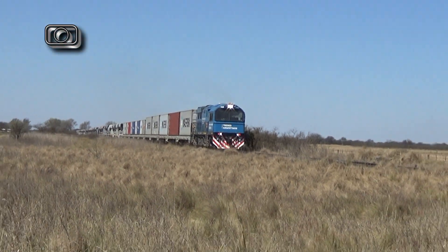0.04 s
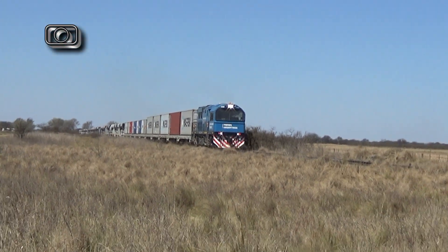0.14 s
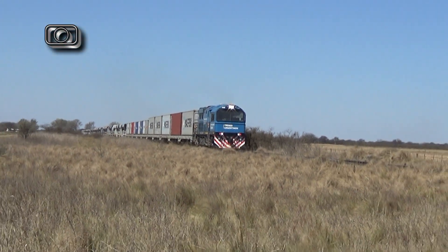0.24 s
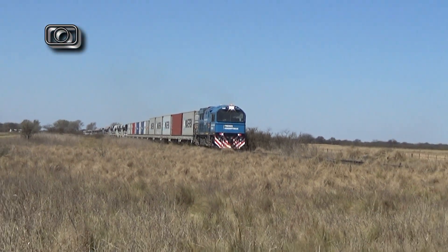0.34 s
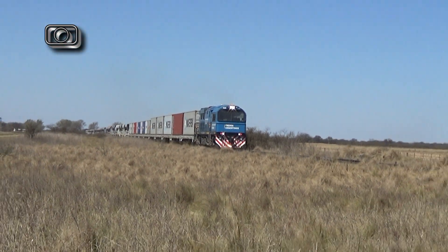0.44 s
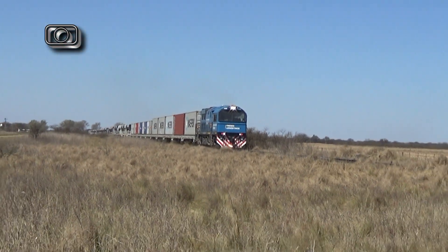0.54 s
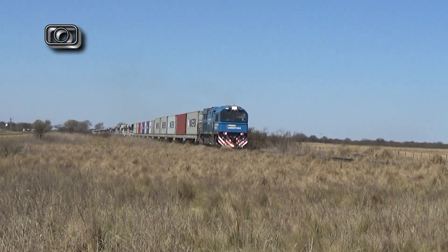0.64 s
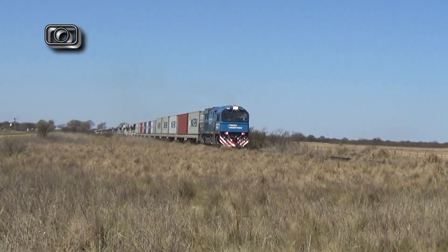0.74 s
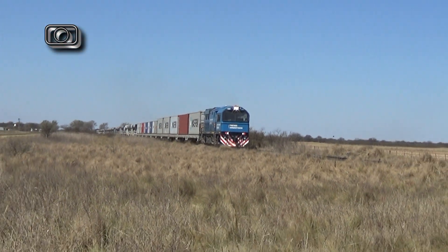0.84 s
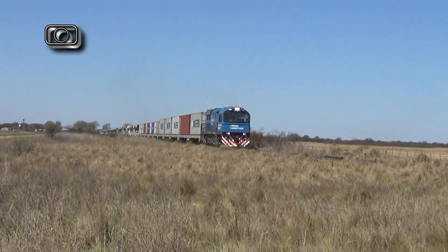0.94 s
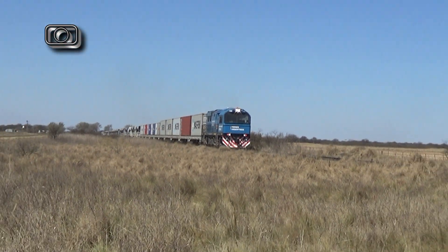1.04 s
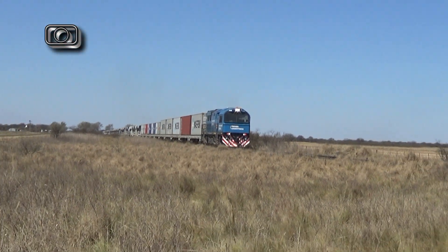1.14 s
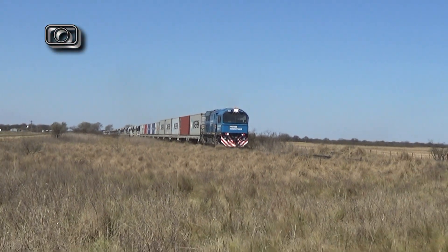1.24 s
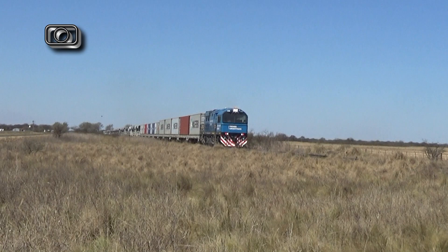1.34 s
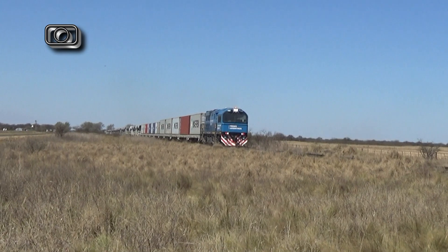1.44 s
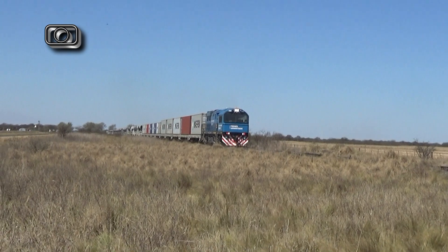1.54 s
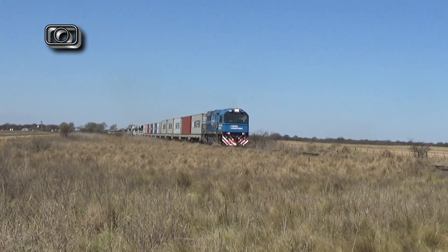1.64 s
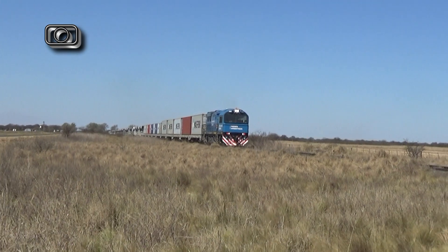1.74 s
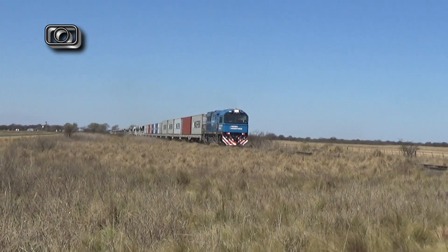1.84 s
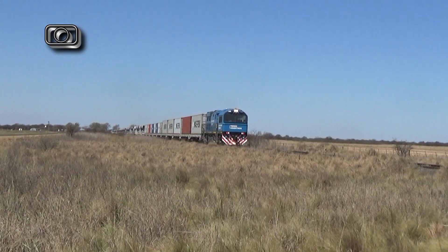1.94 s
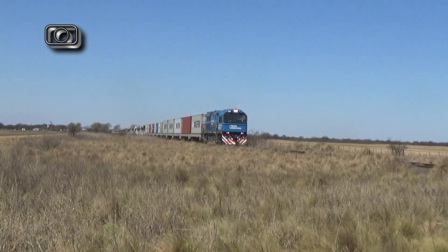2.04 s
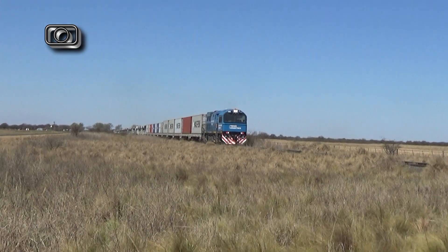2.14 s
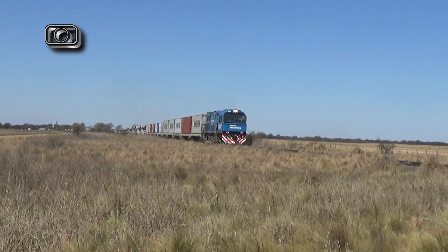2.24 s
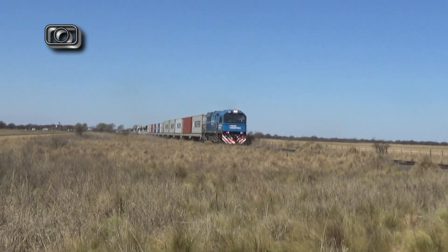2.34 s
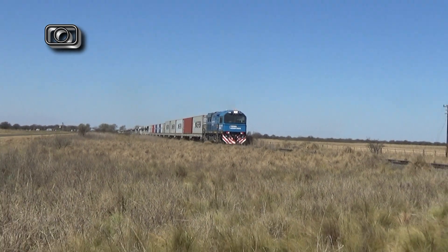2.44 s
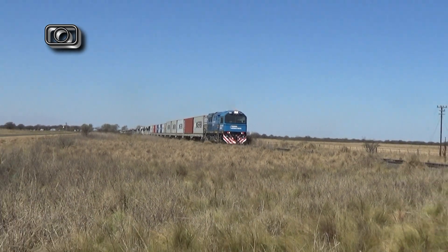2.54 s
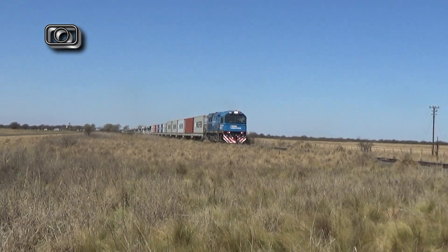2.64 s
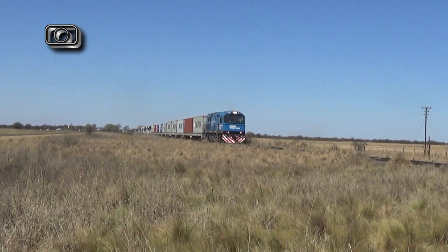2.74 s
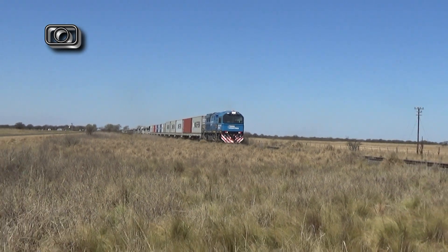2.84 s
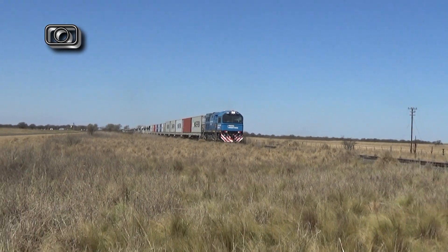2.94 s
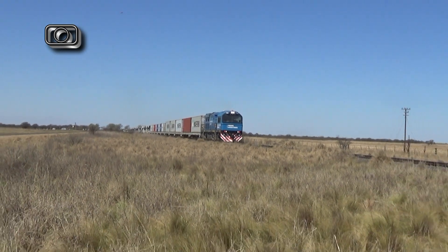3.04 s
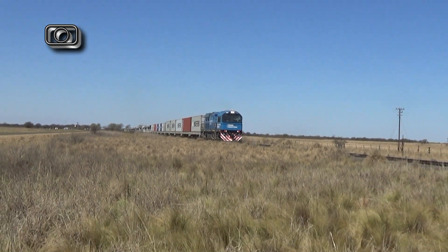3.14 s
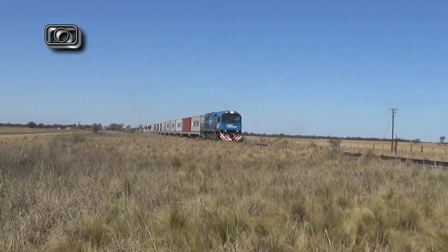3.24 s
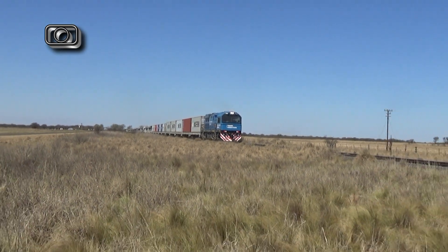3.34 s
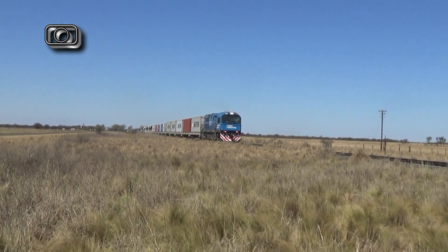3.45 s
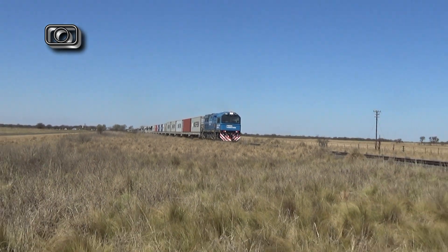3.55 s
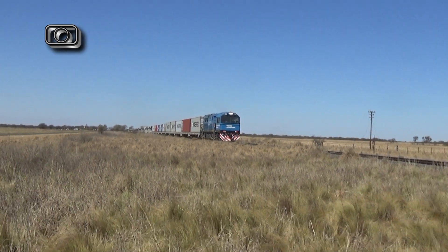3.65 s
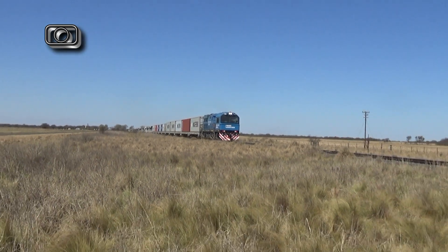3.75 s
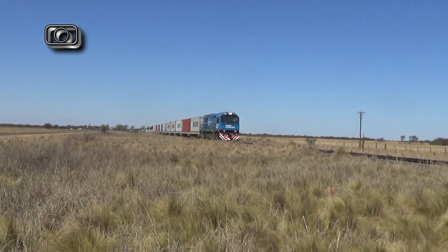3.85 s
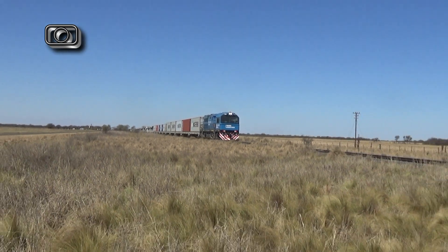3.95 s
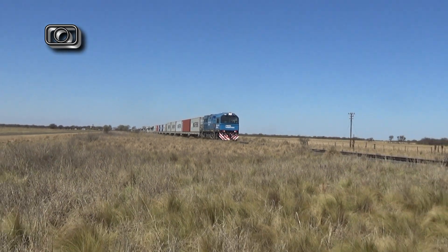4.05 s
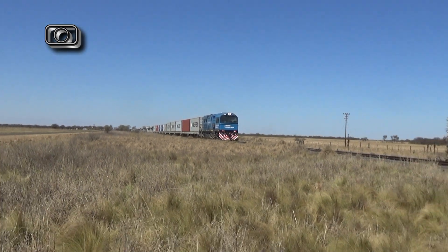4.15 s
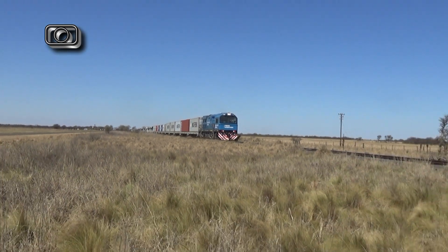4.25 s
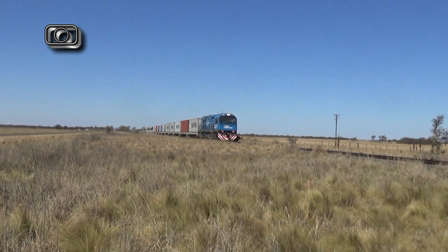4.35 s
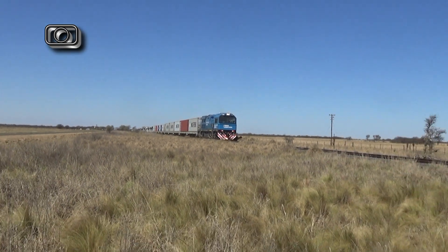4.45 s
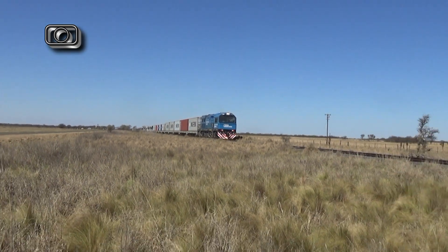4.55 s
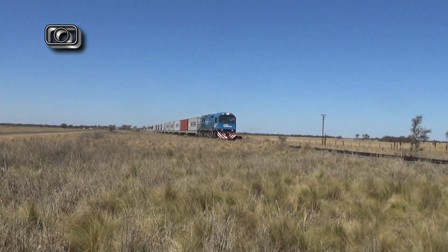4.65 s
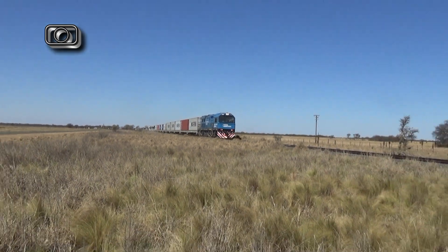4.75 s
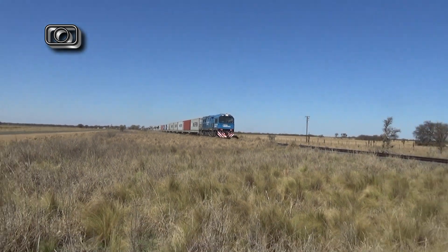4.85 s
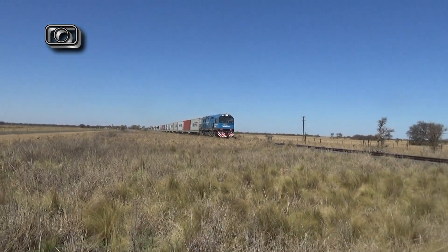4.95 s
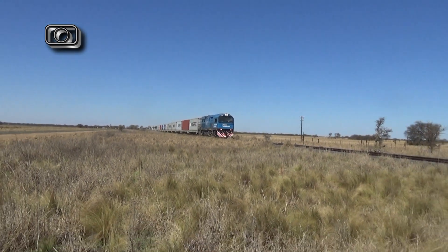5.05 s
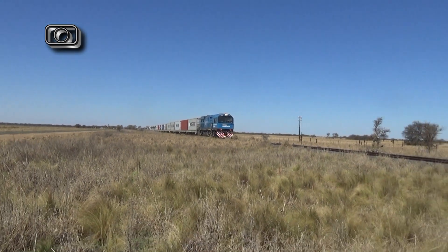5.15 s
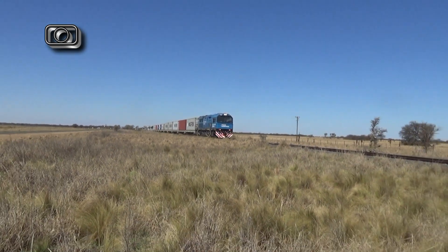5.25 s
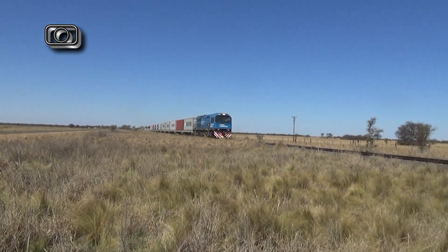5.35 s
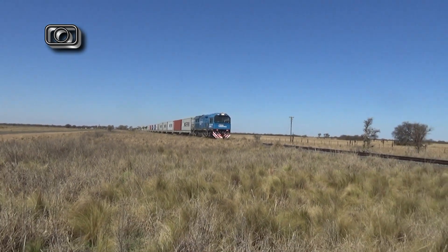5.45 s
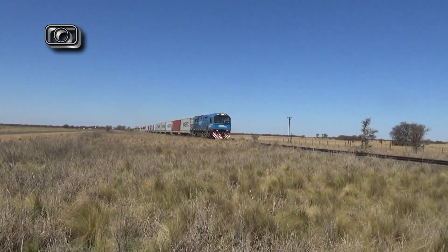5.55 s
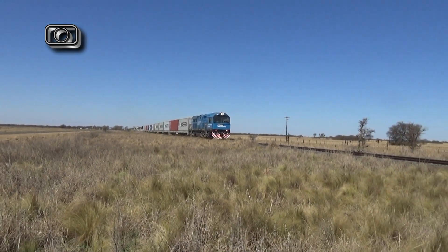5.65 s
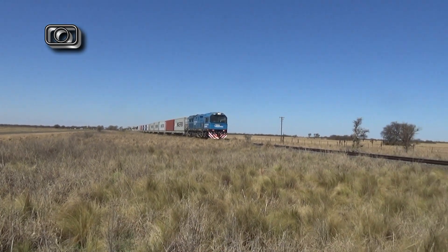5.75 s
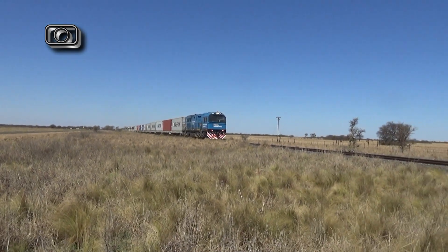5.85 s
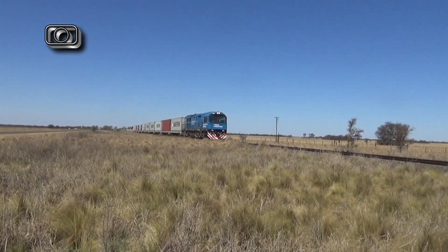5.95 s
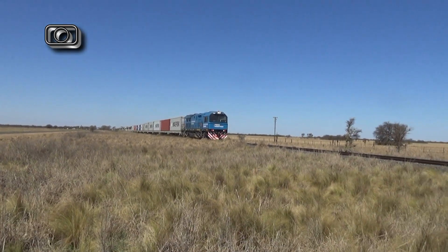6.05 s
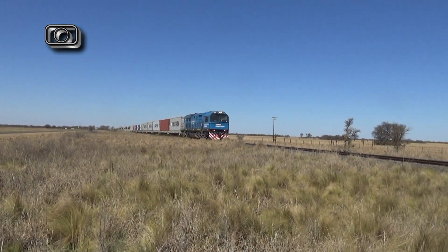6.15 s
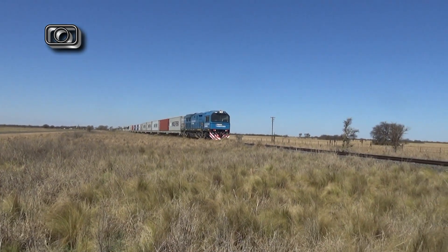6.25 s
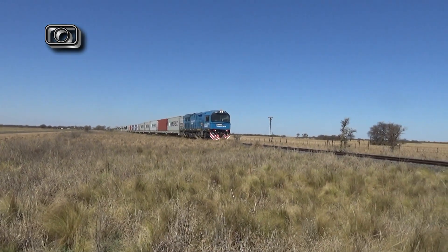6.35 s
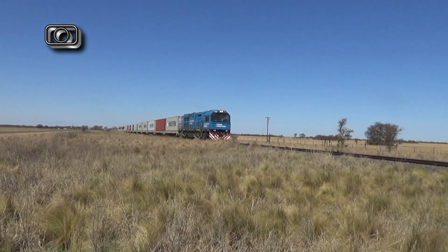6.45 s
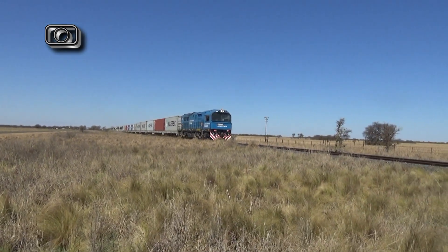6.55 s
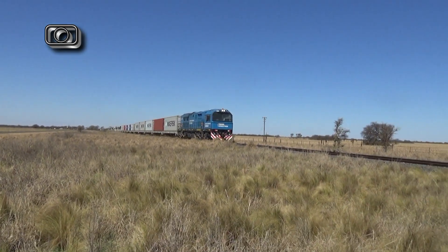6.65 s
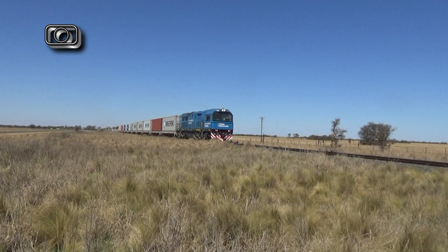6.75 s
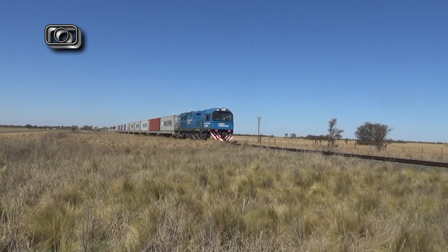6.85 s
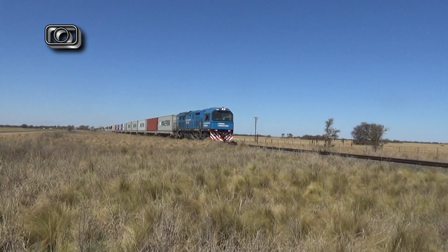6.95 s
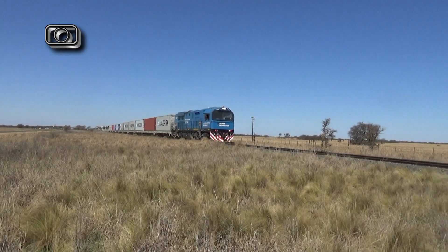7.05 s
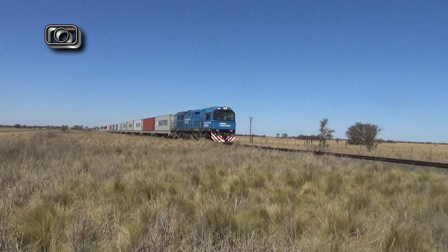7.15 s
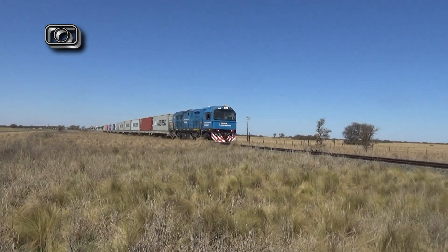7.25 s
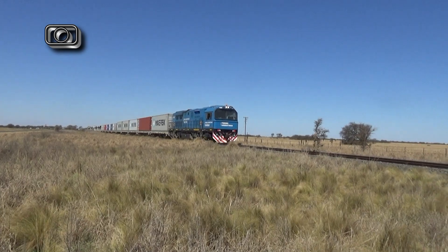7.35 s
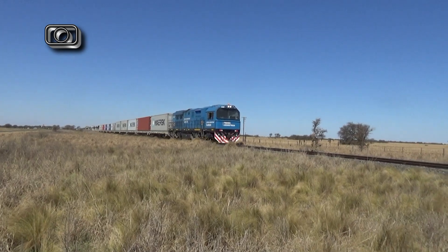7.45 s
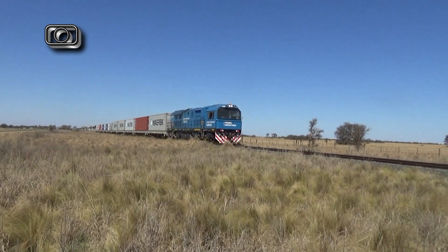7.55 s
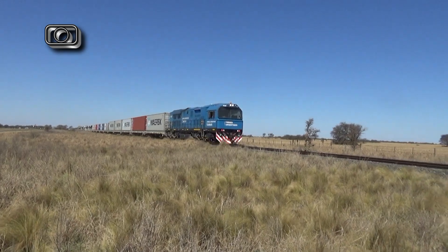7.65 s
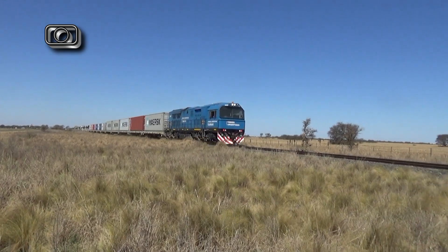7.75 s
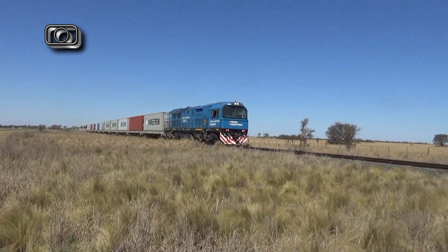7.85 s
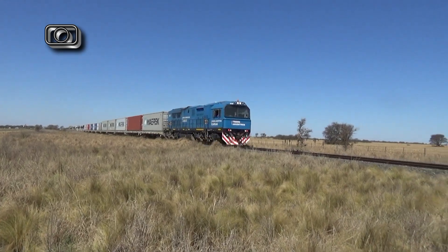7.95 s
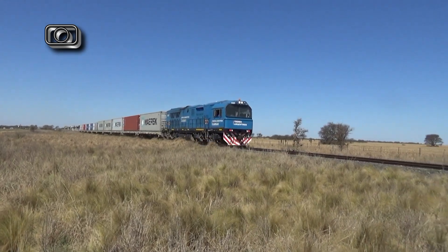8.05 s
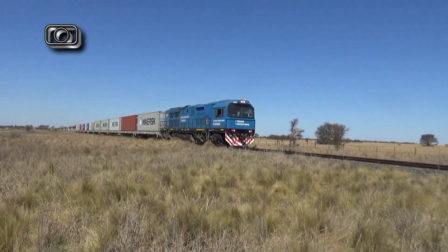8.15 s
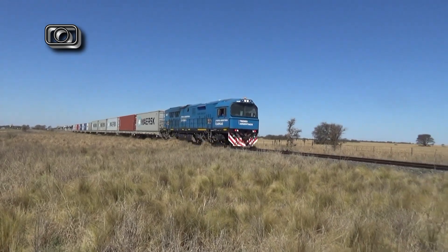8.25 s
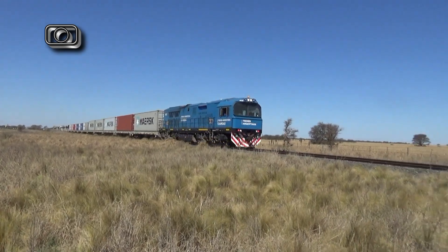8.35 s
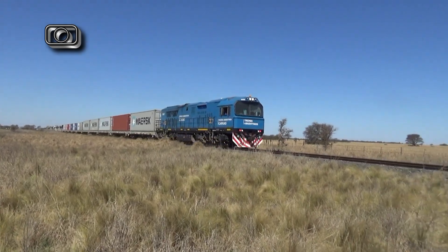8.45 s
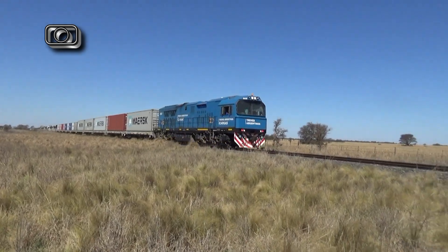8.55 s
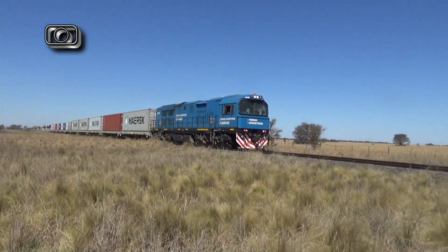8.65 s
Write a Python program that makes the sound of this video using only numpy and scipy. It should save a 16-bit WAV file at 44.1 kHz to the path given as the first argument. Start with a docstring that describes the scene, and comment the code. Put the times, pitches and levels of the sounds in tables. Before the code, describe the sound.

Outdoors in open grassland, a diesel locomotive is at first barely audible under soft microphone hiss and low breeze. Its steady hum wavers in gusts. Midway a loud air horn holds one high note for over a second while a lower trumpet joins in two short blasts. Afterwards the engine grows steadily brighter and louder, ending as a throbbing, metallic roar nearby, slightly left in a small stereo microphone.

```python
"""Diesel locomotive with air horn, open grassland

A locomotive draws near at a steady engine speed: tones locked to its shaft, and noise ringing in its panels.
Its two-tone horn, built from overtones, holds one long high note, and the low trumpet joins twice.
The air carries more treble as the distance shrinks; gusts swell the upper sound over breeze and a faint tick.
A small pair of microphone ports with its own hiss picks it up; a limiter presses the engine under the horn."""
import sys
import numpy as np
from scipy import signal
from scipy.fft import rfft, irfft, next_fast_len
from scipy.io import wavfile

SR = 44100
rng = np.random.default_rng(int(sys.argv[2]) if len(sys.argv) > 2 else 0)


def persist_wave(psi):
    """Save psi, clipped to +-1, as 16-bit WAV."""
    counts = np.round(np.clip(psi, -1, 1) * 32767).astype(np.int16)
    wavfile.write(sys.argv[1], SR, np.atleast_2d(counts).T)


N = 383229
T = np.arange(N) / SR   # seconds
HZ = np.fft.rfftfreq(next_fast_len(N, True), 1 / SR)
SIZE = 2 * (len(HZ) - 1)   # transform length


def from_db(db):
    """Decibels to gain."""
    return 10 ** (np.asarray(db) / 20)


def rms_one(x):
    """Scale to rms 1."""
    return x / np.sqrt(np.mean(x ** 2) + 1e-20)


def in_time(rows):
    """Columns of a table, joined by straight lines, at every sample."""
    seconds, *columns = np.transpose(rows)
    return [np.interp(T, seconds, column) for column in columns]


def at_hz(points, hz):
    """Value of a spectrum, joined by straight lines on a log-frequency axis."""
    point_hz, value = np.transpose(points)
    return np.interp(np.log(np.maximum(hz, 1)), np.log(np.maximum(point_hz, 1)), value)


def drift(corner_hz):
    """Slow chance of spread 1: noise at SR / 40 through a double one-pole low-pass."""
    r = np.exp(-80 * np.pi * corner_hz / SR)
    noise = rng.standard_normal(N // 40 + 2002)
    slow = signal.lfilter([1], [1, -2 * r, r * r], noise)[2000:]
    return np.interp(np.arange(N) / 40, np.arange(len(slow)), rms_one(slow))


def coloured(gain):
    """Noise of rms 1 with a gain given at every frequency."""
    white = rfft(rng.standard_normal(SIZE))
    return rms_one(irfft(white * gain, SIZE)[:N])


# The engine drawing near over the grass.
# Each row: time in seconds, then relative levels in dB of exhaust beat, body roar and rushing band.
APPROACH = [(0, -50, -49, -61.5), (1.5, -49, -48, -66), (3.0, -44.5, -44, -57.5), (4.2, -43, -41.5, -56.5),
            (5.72, -45, -37, -50.5), (6.1, -42.5, -36.5, -51), (6.8, -38, -34, -48),
            (7.0, -36.5, -32.5, -43.5), (7.67, -32.5, -26.5, -34.5), (8.12, -30, -24.5, -32),
            (8.69, -27, -22, -33)]
# Gusty air carries the upper sound across in swells.
# Each row: middle in seconds, time to fall away in seconds (Gaussian, to 1/e), middle and treble gain in dB.
SWELLS = [(0.16, 0.12, 7, -10), (0.666, .1, 3, -7), (1.113, .07, 5, -6), (1.473, 0.15, 5.5, -1),
          (1.955, 0.074, 2.5, -10), (2.856, 0.12, 6, 0), (3.3, 0.17, 1, 6), (4.255, 0.28, 6.5, 3.5),
          (5.68, 0.3, 3.5, 3.5), (5.89, 0.073, -1.5, 4), (6.3, 0.084, -0.5, 1.5), (6.577, 0.18, 1.5, 6),
          (7.162, 0.07, 2.5, 1.5), (7.42, 0.059, -1, 3), (7.769, .11, 0.5, 12.5), (8.462, .12, 1, 13)]
# Air and grass swallow treble over distance, the ground echo hollows out 800 Hz: dB per dB of the body roar.
CLATTER_GROWS, HOLLOW_GROWS = 1.45, 1.23


def band_levels():
    """Beat, roar, machinery, clatter, rush and hollow in dB: all follow the approach, three also the gusts."""
    beat_db, body_db, rush_db = in_time(APPROACH)
    middle_s, half_s, *gains = np.transpose(SWELLS)
    bumps = np.exp(-((T[::100, None] - middle_s) / half_s) ** 2)
    middle_db, treble_db = [np.interp(T, T[::100], bumps @ gain) for gain in gains]
    machinery_db = body_db + middle_db
    clatter_db = CLATTER_GROWS * body_db + treble_db
    return [beat_db, body_db, machinery_db, clatter_db, rush_db + middle_db, HOLLOW_GROWS * body_db]


# The shaft against a steady speed. Each row: time in seconds, lead in turns.
AHEAD = [(0, -.052), (3.8, -.06), (7.4, 0), (8.7, .012)]
REV_PER_S = 13.266
TURN = REV_PER_S * T + np.interp(T, *np.transpose(AHEAD))   # turns of the shaft so far
# Exhaust tones at the stack. Each row: multiple of shaft speed, relative level in dB.
BEAT = [(1, -48), (2, -34), (3, -21), (4, -20), (5, 1.5), (6, -30.5), (7, -9.5), (8, -4.5), (9, -11),
        (10, -8), (11, -7), (12, -21.5), (13, -3.5), (14, -8), (15, -14), (16, -20), (17, -8), (18, -6.5),
        (19, -12), (20, -10.5), (21, -13.5), (22, -14), (23, -22), (24, -8.5), (25, -36), (26, -7),
        (27, -12), (28, -2), (29, -2), (30, -19), (31, -32), (32, -13), (33, -11), (34, -14), (35, -1.5),
        (36, -10.5), (37, 2.5), (38, -8.5), (39, -1.5), (40, -12), (41, -35.5), (42, -54), (43, -4),
        (44, -23), (45, -8), (46, -19)]
# Pressure dips at the stack, mostly in pairs. Each row: place as a share of a turn, relative depth.
DIPS = [(.038, .6), (.086, 1), (.265, .45), (.316, .4), (.453, 1), (.482, .7), (.626, .7), (.854, .7),
        (.891, .5)]
# Gear whine. Each row: multiple of shaft speed, peak in dB beside the upper exhaust tones at rms 1.
WHINE = [(47, -12), (58.75, -13), (66.1, -21), (94, -17)]


def exhaust(beat_db, body_db):
    """Tones on the shaft speed, phased by the pressure dips, plus gears; higher ones waver more on the way."""
    share, depth = np.transpose(DIPS)
    turn = TURN[::10]   # these tones need only every tenth sample
    low, high = 0, 0
    for k, db in BEAT:
        start = np.angle(-np.sum(depth * np.exp(-2j * np.pi * k * share)))
        waver = drift(0.88)[::10] * k
        phase = 2 * np.pi * k * turn + start + .012 * waver[::-1]
        tone = from_db(db + .05 * waver) * np.cos(phase)
        if k < 24:
            low = low + tone
        else:
            high = high + tone
    whine = 0
    for k, db in WHINE:
        whine = whine + from_db(db + 1.1 * drift(10.0)[::10]) * np.cos(2 * np.pi * k * turn)
    coarse = [rms_one(low), rms_one(high) + whine]
    low, high = signal.resample_poly(coarse, 10, 1, axis=1)[:, :N]
    return from_db(beat_db + 7.0) * low + from_db(body_db - 3.0) * high


# Hiss puffs at the firings. Each row: place as a share of a turn, relative strength in dB.
FIRINGS = [(.118, -3), (.313, -1), (.488, -.5), (.725, -1.5), (.88, -3)]


def puffs(width):
    """A bump at each firing, new in strength on every turn; width in turns, mean 1."""
    out = 0
    luck_db = rng.normal(0, 2.5, (int(TURN[-1]) + 3, len(FIRINGS)))
    for k, (share, db) in enumerate(FIRINGS):
        nearest = np.round(TURN - share)
        strength = from_db(db + luck_db[nearest.astype(int) + 1, k])
        out = out + strength * np.exp(-((TURN - share - nearest) / width) ** 2)
    return out / out.mean()


# Body roar when the engine is near. Each row: frequency in Hz, relative level in dB per Hz.
ROAR = [(15, -42), (30, -21), (60, -2), (130, -8), (250, -2), (400, 1), (510, 10.5), (680, -9),
        (1450, -6.5), (1950, -12), (3000, -13.5), (5700, -26), (8200, -39.5), (11000, -37.5), (15500, -56)]
# Resonances of hood and frame. Each row: frequency in Hz, width in Hz, peak in dB on the scale of the roar.
PANELS = [(938, 126, 5.5), (1512, 21, 2.5), (2280, 230, -1), (4280, 94, -15), (5560, 170, -12),
          (8160, 2150, -19.5)]
# Centres in Hz of the beat, roar, machinery, clatter, rush and hollow levels, in that order.
BAND_HZ = [130, 500, 1450, 4500, 2350, 790]


def roar(levels_db, noise_db):
    """Noise ringing in the panels, by third octaves: each follows the distance, flickers, throbs with firings."""
    ring = 0
    for hz, width_hz, db in PANELS:
        resonance = from_db(2 * db) / (1 + (2 * (HZ - hz) / width_hz) ** 2)
        ring = ring + resonance / from_db(2 * at_hz(ROAR, hz))
    ringing = [coloured(np.sqrt(1 + ring)) for k in range(2)]
    near = slice(int(6.5 * SR), N)   # the close stretch sets the reference level
    change_db = np.array([level[::20] - level[near].mean() for level in levels_db])
    beat = puffs(width=0.06)
    together = drift(7.4)[::20]   # flicker shared by all bands
    edges = 25 * 2 ** np.arange(0, 9.4, 1 / 3)
    out = 0
    for k, (low, high) in enumerate(zip(edges, edges[1:])):
        hz = np.sqrt(low * high)
        band_pass = signal.butter(2, [low, high], "band", fs=SR, output="sos")
        band = signal.sosfilt(band_pass, ringing[k % 2])
        # share of each of the six levels at this pitch
        weights = [at_hz(sorted(zip(BAND_HZ, row)), hz) for row in np.eye(len(BAND_HZ))]
        throb = np.clip(at_hz([(200, 0.033), (500, 0.13), (2000, 0.26), (7000, 0.47)], hz), 0, 1)
        flicker_depth = at_hz([(300, 0.32), (1500, 0.37), (8000, 1.8)], hz)
        flicker_db = flicker_depth * (together + drift(14)[::20])
        gain = np.interp(T, T[::20], from_db(at_hz(ROAR, hz) + weights @ change_db + flicker_db))
        out = out + band * (1 - throb + throb * beat) * gain
    return from_db(noise_db) * out / np.std(out[near])


def blow(blasts, shape, bend, hz):
    """Level dB, brightness and pitch: quick attack, pressure builds, sags, falls as the valve shuts, rings out."""
    attack_s, build_db, build_s, sag_db, close_s, close_db, dull_db, ring_s = shape
    opening_hz, settling_s, closing_hz = bend
    level_db, bright, pitch = np.full(N, -90.), np.zeros(N), np.full(N, hz)
    for start, stop, db, tilt_db in blasts:
        on = (T > start) & (T < stop + ring_s)
        age, left = T[on] - start, stop - T[on]
        rising = np.clip(1 - age / attack_s, 0, 1)
        closing = np.clip(1 - left / close_s, 0, 1)
        ringing_out = np.minimum(left, 0) / ring_s   # 0, then down to -1
        level_db[on] = (db - 45 * rising ** 2 - build_db * np.exp(-age / build_s) - sag_db * age
                        - close_db * closing ** 2 + 45 * ringing_out)
        bright[on] = tilt_db - 12 * rising - dull_db * closing + 25 * ringing_out
        falling = np.sin(np.pi / 2 * np.minimum(1.5 * closing, 1)) ** 2
        pitch[on] += opening_hz * np.exp(-age / settling_s) + closing_hz * falling
    return level_db, bright, pitch


def trumpet(level_db, bright, pitch, tones, spread):
    """A diaphragm chops the air into pulses; every overtone wavers a little in the wind."""
    on = level_db > -89
    phase = 2 * np.pi * np.cumsum(pitch[on]) / SR
    out = np.zeros(N)
    total = np.sqrt(np.sum(from_db(np.array(tones)[:, 1]) ** 2) / 2)
    wind = drift(14.0)
    for k, db in tones:
        waver_db = .6 * np.sqrt(k) * np.roll(wind, int(k) * 12000)[on]
        overtone = np.sin(k * phase + spread * k * k)   # the spread staggers the starting phases
        out[on] += from_db(db + bright[on] * np.log2(k) + waver_db) * overtone
    return from_db(level_db) * out / total, from_db(level_db) * on


# Overtones of the two trumpets. Each row: multiple of the note, relative level in dB.
HIGH_TONES = [(1, 5.5), (2, -2), (3, 1), (4, -2.5), (5, -7.5), (6, -15), (7, -17), (8, -14), (9, -11.5),
              (10, -16.5), (11, -24.5), (12, -24), (13, -24.5), (14, -32), (15, -28), (16, -34.5),
              (17, -38), (18, -30), (19, -43), (20, -46), (21, -40), (22, -56)]
LOW_TONES = [(1, -13), (2, 0), (3, -3), (4, -14), (5, -26), (6, -26), (7, -22), (8, -22), (9, -27),
             (10, -25), (11, -29), (12, -30), (13, -31), (14, -31), (15, -34), (16, -37), (17, -35),
             (18, -37), (20, -40), (22, -42), (24, -44), (26, -46)]
# Blasts. Each row: valve opens in seconds, diaphragm stops in seconds, level in dB, brightness in dB per octave.
HIGH_BLASTS = [(4.301, 5.617, -7, 0.6)]
LOW_BLASTS = [(4.313, 4.705, -6, 1), (4.848, 5.25, -6, 0.24)]
HIGH_HZ, LOW_HZ = 684.7, 384.0
# Course of a blast. The row: attack in seconds, build-up in dB, build-up in seconds, sag in dB per second,
# closing in seconds, closing in dB, closing dullness in dB per octave, ring-out in seconds.
HIGH_SHAPE = (0.018, 8.5, 0.083, 1.6, .075, 8.2, 3.2, 0.014)
LOW_SHAPE = (0.027, 6.6, 0.039, 10.6, 0.0554, 12, 1.8, .04)
# Pitch off the note at low pressure. The row: opening in Hz, settling in seconds, closing in Hz.
HIGH_BEND = (12, .025, 17)
LOW_BEND = (18, .03, -5)
# What the high trumpet loses while the low one draws air: level in dB, brightness in dB per octave.
SHARED_AIR_DB, SHARED_DULL_DB = 2, 0.77
# Rush of air through the horn. Each row: frequency in Hz, relative level in dB per Hz.
HORN_AIR = [(200, -35), (500, -28), (800, -23), (1300, -26), (3500, -27), (7000, -24.5), (15000, -43)]


def horn():
    """Two trumpets on one air pipe: the slow swing of the low one tugs at the high one, giving sum tones."""
    low_db, low_bright, low_pitch = blow(LOW_BLASTS, LOW_SHAPE, LOW_BEND, LOW_HZ)
    high_db, high_bright, high_pitch = blow(HIGH_BLASTS, HIGH_SHAPE, HIGH_BEND, HIGH_HZ)
    shared = np.minimum(from_db(low_db - low_db.max() + 6), 1)   # full within 6 dB of the low one's peak
    high_db = high_db - SHARED_AIR_DB * shared
    high_bright = high_bright - SHARED_DULL_DB * shared
    high, high_flow = trumpet(high_db, high_bright, high_pitch, HIGH_TONES, spread=.55)
    low, low_flow = trumpet(low_db, low_bright, low_pitch, LOW_TONES, spread=.3)
    flow = from_db(-26) * high_flow + from_db(-22) * low_flow
    air = coloured(from_db(at_hz(HORN_AIR, HZ))) * flow
    swing = signal.sosfilt(signal.butter(1, 350, fs=SR, output="sos"), low)
    tug = signal.sosfilt(signal.butter(2, 800, "high", fs=SR, output="sos"), 1.7 * high * swing)
    return air - high - low - tug


# Faint tick near the microphone. Each row: time in seconds, peak in dB, frequency in Hz.
TICKS = [(0.6594, -46, 8140)]


def ticks():
    """Short dry clicks, each a few milliseconds of ringing."""
    out = np.zeros(N)
    for s, db, hz in TICKS:
        age = np.maximum(T - s, 0)
        out += from_db(db - 60 * age / 0.013) * np.sin(2 * np.pi * hz * age)
    return out


def breeze():
    """Low rumble of the breeze: lumpy noise at the bottom of hearing."""
    shape = (HZ > 22) / (1 + (HZ / 42) ** 4)   # Hz
    return from_db(-58 + 1.7 * drift(5.3)) * coloured(shape)


# Microphone noise. Each row: frequency in Hz, relative level in dB per Hz.
HISS = [(1760, -20), (3000, -1), (3510, -3.5), (5570, -5.5), (8070, -9), (10100, -8.5), (15500, -11)]


def microphone_hiss():
    """Coloured noise common to both ports, with a weaker part of its own at each."""
    common, left, right = [coloured(from_db(at_hz(HISS, HZ))) for k in range(3)]
    return from_db(-65.5) * (common + .3 * np.array([left, right]))


# Lead of the left port. Each row: frequency in Hz, lead in radians.
LEAD = [(25, .5), (60, .55), (125, 1.0), (260, 1.5), (520, 1.2), (1120, .82), (2580, .52), (6700, .46),
        (12000, .1)]
# Sound scattered by the grass, unlike at each port. Each row: frequency in Hz, relative level in dB.
SCATTER = [(500, -84), (2000, -26), (4500, -14.5), (8000, -14), (12000, -30)]
SCATTER_S = .02   # its decay in time


def ports(x, pan_db):
    """The two ports hear one wave with a lead and a balance that depend on pitch; their cavity has a treble dip."""
    dip = 1 - .5 / (1 + ((HZ - 7300) / 350) ** 2)
    wave = rfft(x, SIZE) * dip
    half = from_db(pan_db / 2) * np.exp(.5j * at_hz(LEAD, HZ))   # half the difference to each side
    grass = rng.standard_normal(SR // 10) * np.exp(-T[:SR // 10] / SCATTER_S)
    stray = from_db(at_hz(SCATTER, HZ)) * rfft(grass / np.linalg.norm(grass), SIZE)
    left = irfft(wave * (half + stray), SIZE)[:N]
    right = irfft(wave * (1 / half - stray), SIZE)[:N]
    return np.array([left, right])


# Engine balance. Each row: frequency in Hz, left minus right in dB.
ENGINE_PAN = [(60, 1.4), (240, .7), (950, .6), (3800, .9), (15000, .5)]
# The engine drawing left. Each row: time in seconds, change of left minus right in dB.
DRAWING_LEFT = [(0, -.6), (4.2, -.4), (6.5, 0), (8.69, .1)]


def scene():
    """Engine a little to the left, horn a little to the right, microphone noise under all."""
    levels_db = band_levels()
    beat_db, body_db = levels_db[:2]
    engine = exhaust(beat_db, body_db) + roar(levels_db, noise_db=-25.0)
    engine = ports(engine, at_hz(ENGINE_PAN, HZ))
    engine = engine * from_db(in_time(DRAWING_LEFT)[0] * np.array([[.5], [-.5]]))
    others = ports(horn() + ticks() + breeze(), -0.35)
    return engine + others + microphone_hiss()


def record(dry):
    """A limiter follows the loudness and rounds what slips past, then the top is cut."""
    r = np.exp(-1 / (.007 * SR))   # 7 ms smoothing
    power = signal.lfilter([1 - r], [1, -r], np.mean(dry ** 2, axis=0))
    level_db = 10 * np.log10(power + 1e-12)
    release = 60.0 * T   # the held level falls at 60 dB a second
    held_db = np.maximum.accumulate(level_db + release) - release
    excess_db = np.maximum(held_db + 15.0, 0)   # above -15 dB
    cut_db = signal.lfilter([1 - r], [1, -r], 0.91 * excess_db)
    rounded = .8 * np.tanh(dry * from_db(-cut_db) / .8)
    top_cut = signal.cheby2(18, 60, 15800, fs=SR, output="sos")   # Hz
    return signal.sosfilt(top_cut, rounded)


dry = scene()
out = record(dry)
persist_wave(out)
```